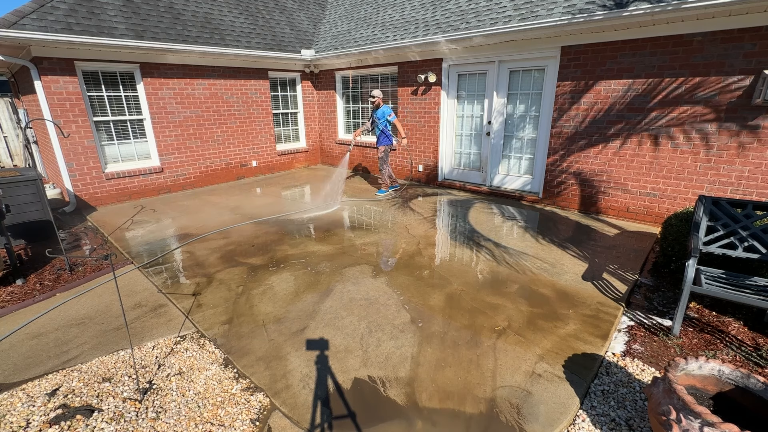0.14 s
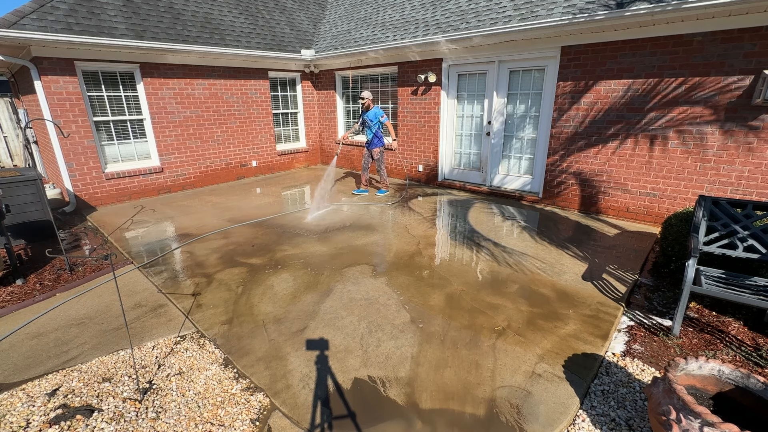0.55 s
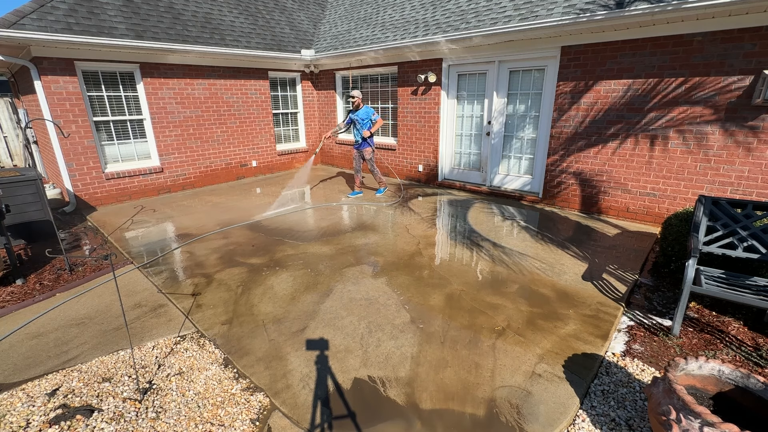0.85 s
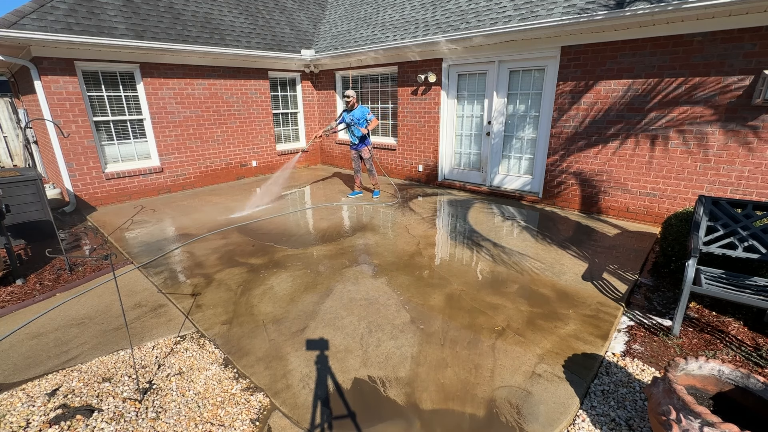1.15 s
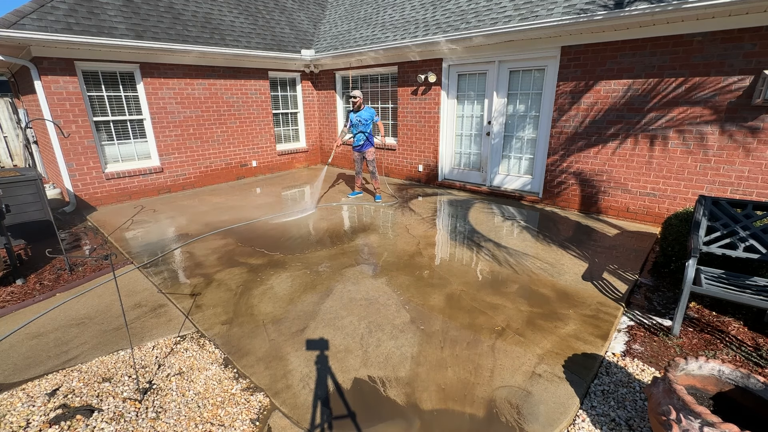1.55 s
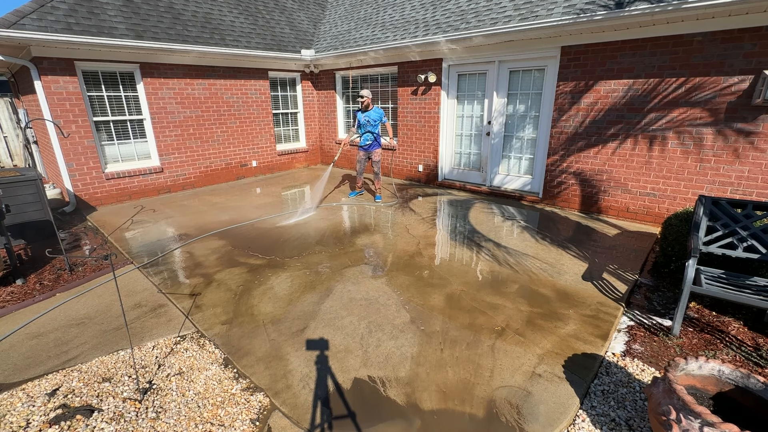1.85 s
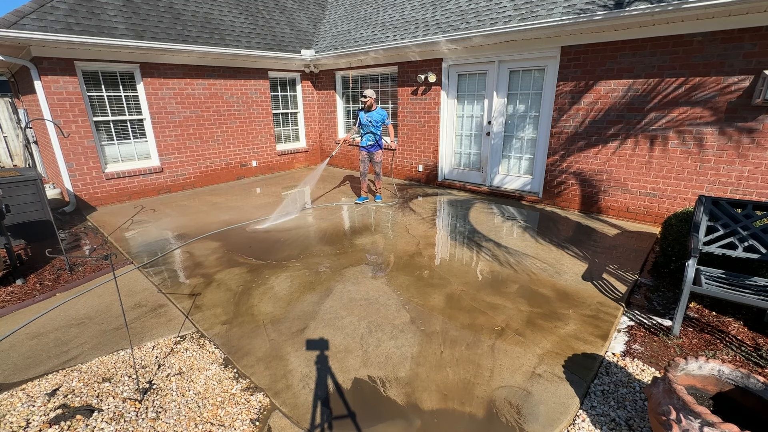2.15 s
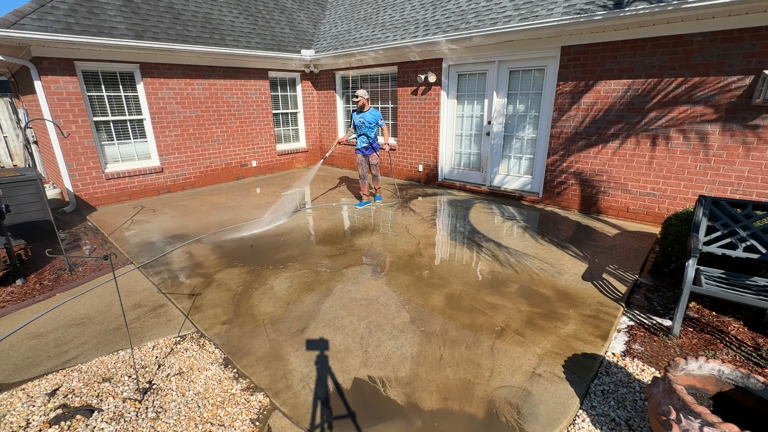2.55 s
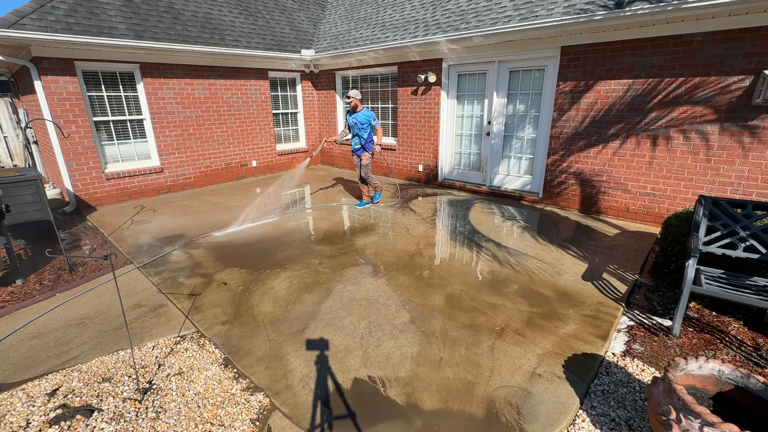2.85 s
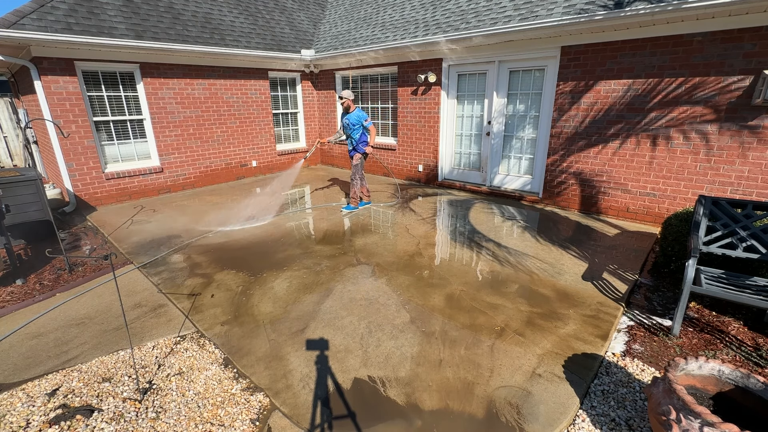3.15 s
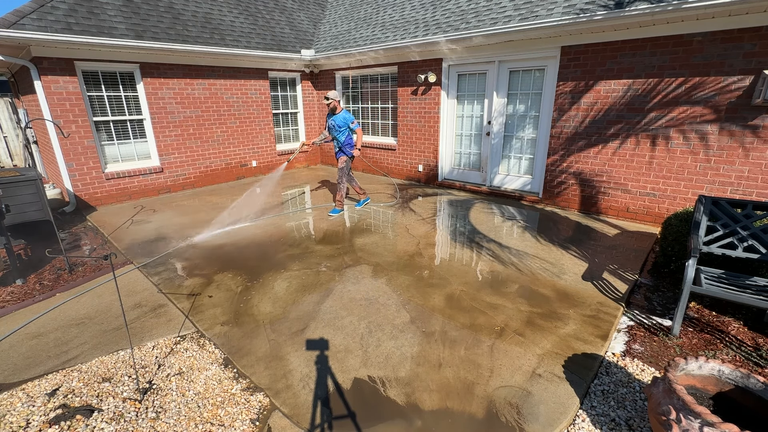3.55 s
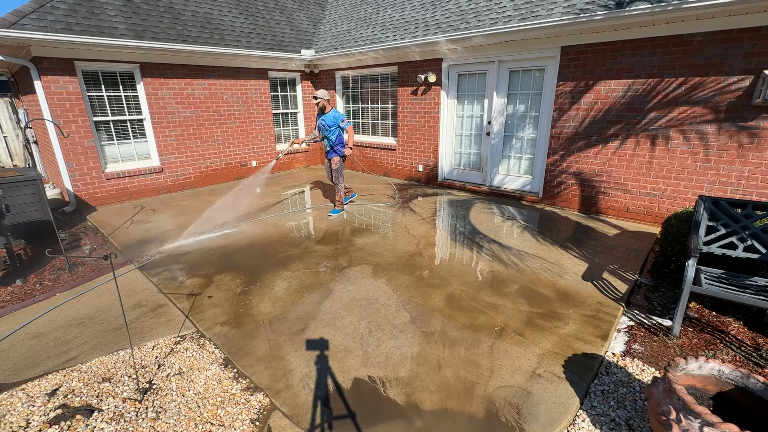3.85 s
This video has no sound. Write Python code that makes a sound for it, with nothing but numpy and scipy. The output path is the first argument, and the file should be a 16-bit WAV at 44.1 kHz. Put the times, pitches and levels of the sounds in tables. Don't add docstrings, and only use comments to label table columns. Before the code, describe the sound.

A pressure washer jet runs without pause for four seconds, a bright fizzing hiss over dense splashing on wet concrete, reflected by brick walls. Its level and treble waver slightly as the lance sweeps, with a fuzzy, wandering singing band in the spray. A motor and pump hum low and throb further off. Light wind puffs thud on the left; from about 3.5 s a gust buffets both sides.

```python
import sys
import numpy as np
from scipy import signal
from scipy.io import wavfile
from scipy.ndimage import uniform_filter1d

SR = 44100
rng = np.random.default_rng(int(sys.argv[2]) if len(sys.argv) > 2 else 0)


def amplitude_ratio(level_db):
    exponent = np.asarray(level_db, float) / 20
    return 10 ** exponent


def inscribe(sig):
    pcm = np.round(np.clip(np.atleast_2d(sig).T, -1, 1) * 32767)
    wavfile.write(sys.argv[1], SR, pcm.astype(np.int16))


N = 176400


def evened(x):
    return x / np.sqrt(np.mean(np.abs(x) ** 2) + 1e-20)


def read(points, hz):
    f, value = np.transpose(points)
    return np.interp(np.log(hz + 1), np.log(f + 1), value)


def control(table, column):
    table = np.array(table)
    return np.interp(np.arange(N) / SR, table[:, 0], table[:, column])


def drift(t, low_hz, high_hz):
    f = np.geomspace(low_hz, high_hz, num=30)[:, None]
    waves = np.sin(2 * np.pi * (f * t + rng.random((30, 1))))
    return evened((waves / np.sqrt(f)).sum(0))


def fast_drift(low_hz, high_hz):
    t = np.arange(N) / SR
    return np.interp(t, t[::64], drift(t[::64], low_hz, high_hz))


def patches(t, hz, bins, frames):
    raw = rng.standard_normal((len(t), len(hz))).T
    across_hz = uniform_filter1d(raw, bins, axis=0)
    return evened(uniform_filter1d(across_hz, frames, axis=1))


def pair(field, size):
    hop = size // 4
    t = np.arange(N // hop + 5) * hop / SR
    hz = np.fft.rfftfreq(size, 1 / SR)
    a, b, c, d = rng.standard_normal((len(t), len(hz), 4)).T
    db, same, lead, pan_db = field(t, hz[:, None])
    same = np.clip(same, -1, 1)
    left = a + 1j * b
    other = c + 1j * d
    right = (same * left + np.sqrt(1 - same ** 2) * other) * np.exp(-1j * lead)
    z = np.array([left * amplitude_ratio(db + pan_db / 2), right * amplitude_ratio(db - pan_db / 2)])
    return evened(signal.istft(z, nperseg=size, noverlap=size - hop)[1][:, :N])


def swells(rows):
    t = np.arange(N) / SR
    return sum(amplitude_ratio(db) * np.exp(-(2 * (t - s) / length) ** 4) for s, length, db in rows)


def lines(base_hz, wobble, rows):
    # frequency in Hz, phase by which left leads in radians.
    hum_turn = [(60, .2), (140, 0.58), (220, 0.22), (500, 1.57), (900, 2.22), (1500, 2.3)]
    right_db = 0.5
    t = np.arange(0, N + 64, 64) / SR

    def slow(low_hz, high_hz):
        return np.interp(np.arange(N) / SR, t, drift(t, low_hz, high_hz))

    turns = np.cumsum(base_hz * (1 + wobble * slow(0.2027, 3.21))) / SR
    out = np.zeros((2, N))
    for k, db, rough in rows:
        waver = 1 + rough * (slow(1, 9) + 1j * slow(1, 9))
        z = waver * np.exp(2j * np.pi * (k * turns + rng.random()))
        lead = read(hum_turn, k * base_hz)
        right = amplitude_ratio(right_db) * (z * np.exp(-1j * lead)).real
        out += amplitude_ratio(db) * evened(np.array([z.real, right]))
    return out


def jet():
    flutter_db = 0.35
    return (nozzle() + splash()) * amplitude_ratio(flutter_db * fast_drift(6, 40))


def nozzle():
    # time in s, level as the nozzle faces the ports in dB.
    sweep = [(0, -34), (.2, -32), (.31, -28.5), (.38, -35), (.42, -31.5), (.72, -31), (1, -33.5),
             (1.45, -36.5), (1.53, -33), (1.85, -34), (2, -30.5), (2.35, -34.5), (2.93, -32.5), (2.98, -35),
             (3.18, -36), (3.3, -31), (3.5, -35), (3.6, -32.5), (4, -35.5)]
    # frequency in Hz, density in dB per Hz.
    fizz = [(4000, -30), (7500, -12), (9000, -6), (9900, -5.5), (10700, -2), (12200, -1.5), (13200, 0),
            (15700, -.3)]
    # frequency in Hz, left-right likeness.
    likeness = [(7500, .25), (9000, .5), (9700, .9), (10500, .985), (11000, 1), (12600, .985), (14000, 1),
                (16000, .99)]
    # time in s, phase between ports in radians.
    aim = [(0, -1.6), (.5, -1.63), (2, -1.63), (2.3, -1.56), (3, -1.56), (3.2, -1.62), (3.5, -1.57),
           (4, -1.57)]
    level_db, patchy_db, flicker_db = 5.5, 0.8, 0.48
    lag_s = 0.0001553

    def field(t, hz):
        db = read(fizz, hz) + patchy_db * patches(t, hz, bins=9, frames=40)
        db = db + flicker_db * drift(t, 17, 60)
        lead = -(2 * np.pi * hz * lag_s + np.interp(t, *np.transpose(aim)))
        return db, read(likeness, hz), lead, 0 * hz

    return amplitude_ratio(level_db + control(sweep, column=1)) * pair(field, size=256)


def splash():
    # frequency in Hz, density in dB per Hz.
    spatter = [(300, -5), (800, -1.5), (2100, -3), (4000, -5), (6000, -3.5), (7800, -9), (10300, -11),
               (11000, -32)]
    # frequency in Hz, left-right likeness.
    likeness = [(250, .8), (550, .38), (3500, .47), (3950, .06), (4400, .27), (4850, .08), (5500, .22),
                (6000, .04)]
    # frequency in Hz, phase by which left leads in radians.
    turn = [(300, .23), (1300, 2.7), (2200, 1.8), (3600, 3.1), (4050, 5.4), (4650, 6.5), (5000, 4.7),
            (5900, 4.9)]
    # frequency in Hz, left minus right in dB.
    pan = [(200, -1.5), (800, 4), (1500, 4), (2150, 0), (3200, 6), (4100, 1.5), (5800, 8), (8300, 2)]
    # time in s, jet impact in dB.
    impact = [(0, 0), (.4, -3), (.75, 2), (1.05, -1), (1.2, 0.5), (1.4, -1), (1.6, -0.5), (2, -0.5),
              (2.35, -1.5), (2.7, -0.5), (2.9, 2.5), (3.1, 0), (3.3, 1), (3.45, 0.5), (3.8, 1.5), (4, 2)]
    # frequency in Hz, share of the impact swing.
    impact_share = [(500, 0.44), (1500, 0.07), (3000, 0.16), (4200, 1), (5500, 0.94), (9000, 1)]
    # time in s, low roar in dB.
    roar = [(0, 3), (.4, 2.5), (.9, 0), (1.5, 1), (2.5, 0.5), (2.9, 1), (3.3, 0.5), (3.6, 0.5), (4, 1)]
    level_db, patchy_db, flicker_db = -32.5, 0.55, 0.1
    roar_top_hz = 2220

    def field(t, hz):
        db = read(spatter, hz) + patchy_db * patches(t, hz, bins=9, frames=20)
        db = db + flicker_db * drift(t, 8, 40)
        db = db + read(impact_share, hz) * np.interp(t, *np.transpose(impact))
        db = db + np.interp(t, *np.transpose(roar)) / (1 + (hz / roar_top_hz) ** 4)
        return db, read(likeness, hz), read(turn, hz), read(pan, hz)

    return amplitude_ratio(level_db) * pair(field, size=512)


def singing():
    # time in s, swell in dB, phase by which left leads in radians.
    swell = [(0, 0.5, 1.9), (.3, 4.5, 1.3), (.45, 2.5, 1.4), (.65, 4, 1.7), (1, 1, 2.2), (1.15, 2.5, 1.6),
             (1.5, 0.5, 1.6), (1.65, 3, 1.3), (1.9, 3, 2), (2.3, 5, 1.9), (2.5, 3, 1.4), (2.8, 2.5, 2),
             (3.2, -0.5, 2), (3.4, 4, 2.3), (3.55, 2.5, 3.2), (3.8, 2, 2.1), (4, 1, 2.2)]
    # time in s, band centre in Hz.
    path = [(0.0, 2690), (0.02, 2630), (1.0, 2740), (1.07, 2560), (1.2, 2790), (1.99, 2600), (2.07, 2690),
            (2.92, 2760), (2.93, 2670), (3.9, 2760), (4.0, 2600)]
    level_db, width_hz, wander_hz = -43, 240, 20

    def field(t, hz):
        centre_hz = np.interp(t, *np.transpose(path)) + wander_hz * drift(t, 1.505, 9.3)
        off = (hz - centre_hz) / width_hz
        lead = np.interp(t, *np.transpose(swell)[::2])
        return -20 * np.log10(1 + (2 * off) ** 2), 0.63, lead, 1.2

    return amplitude_ratio(level_db + control(swell, column=1)) * pair(field, size=1024)


def engine():
    # multiple of pump shaft speed, level in dB, unsteadiness.
    shaft_orders = [(3, -51, 1), (5, -39.5, 0.092), (6, -54.5, 0.32), (8, -52, 0.29)]
    # multiple of firing rate, level in dB.
    firing_orders = [(4, -50.5), (5, -47), (7, -55), (8, -57), (18, -54), (19, -67), (20, -69), (26, -61),
                     (29, -61), (30, -61), (32, -61), (40, -59), (42, -53.5), (48, -57), (49, -56)]
    # centre in s, length in s, level in dB.
    hum_swells = [(.05, .12, -44), (.33, 0.24, -43), (.52, .1, -41), (.8, 0.22, -39.5), (1, 0.083, -43),
                  (1.2, .14, -41), (1.4, .1, -42), (1.7, 0.23, -40.5), (1.95, 0.092, -42), (2.2, 0.18, -38),
                  (2.45, 0.12, -38), (2.7, .14, -43), (2.9, .12, -36.5), (3.08, 0.13, -41), (3.22, 0.17, -40),
                  (3.4, 0.093, -40), (3.68, 0.22, -39), (3.97, 0.11, -41)]
    # frequency in Hz, density in dB per Hz.
    dull = [(25, -30), (45, -21), (60, 0), (120, -3.5), (180, -12), (300, -10), (600, -29.5)]
    rumble_db, firing_rough = -42, 0.39

    def field(t, hz):
        return read(dull, hz) + 0 * t, 0.95, 0.15, -0.3

    shaft = lines(27.47, 0.0037, shaft_orders)
    firing = lines(29.63, 0.00204, [(k, db, firing_rough) for k, db in firing_orders])
    throb = swells(hum_swells) * lines(56.96, 0.029, [(0.99, 0, 0.099)])
    return shaft + firing + throb + amplitude_ratio(rumble_db) * pair(field, size=2048)


def wind():
    # frequency in Hz, density in dB per Hz.
    buffet = [(20, -38), (38, -16), (55, -4), (80, 0), (115, -5), (160, -16), (250, -23), (400, -36)]
    # centre in s, length in s, level in dB.
    puffs = [(.04, .1, -39), (.92, .24, -39), (1.22, .05, -40), (1.37, .05, -40), (1.47, .06, -35),
             (1.61, .09, -35), (1.72, .05, -41), (1.82, .05, -40), (2.2, .2, -45), (2.47, .05, -42),
             (2.72, .05, -35), (3.1, .12, -37), (3.25, .12, -36), (3.47, .08, -41)]
    # time in s, level in dB.
    gust = [(0, -44), (.1, -54), (.6, -58), (.95, -49), (1.15, -55), (1.9, -58), (2.2, -52), (2.6, -57),
            (3, -51), (3.45, -48), (3.53, -36), (3.58, -29), (3.63, -26), (3.72, -28), (3.8, -32),
            (3.87, -37), (3.92, -30), (4, -30)]
    lumpy_db = 2.5

    def field(t, hz):
        return read(buffet, hz) + 0 * t, -0.8, 0, 0

    air = pair(field, size=2048)
    level = air / np.sqrt(uniform_filter1d(air ** 2, size=3000, axis=1) + 0.16)
    lumps = evened(amplitude_ratio(lumpy_db * fast_drift(8.9, 35)))
    return level * lumps * (amplitude_ratio(control(gust, column=1)) + swells(puffs) * np.array([[1], [0]]))


def scene():
    return jet() + singing() + engine() + wind()


def low_pass(x):
    return signal.sosfilt(signal.butter(12, 15990, fs=SR, output="sos"), x)


def record(dry):
    bass_cut = signal.butter(4, 32, "high", fs=SR, output="sos")
    taps = signal.firwin(2047, 15740, window=("kaiser", 10), fs=SR)
    mix = signal.oaconvolve(signal.sosfilt(bass_cut, dry), taps[None], "same")
    return low_pass(mix)


dry = scene()
out = record(dry)
inscribe(out)
```